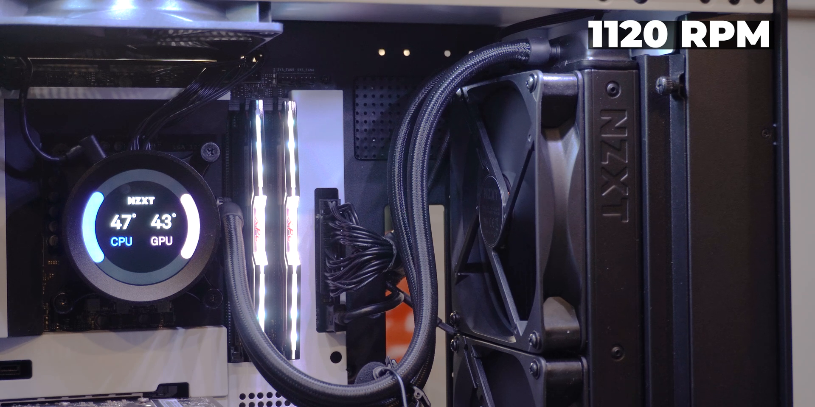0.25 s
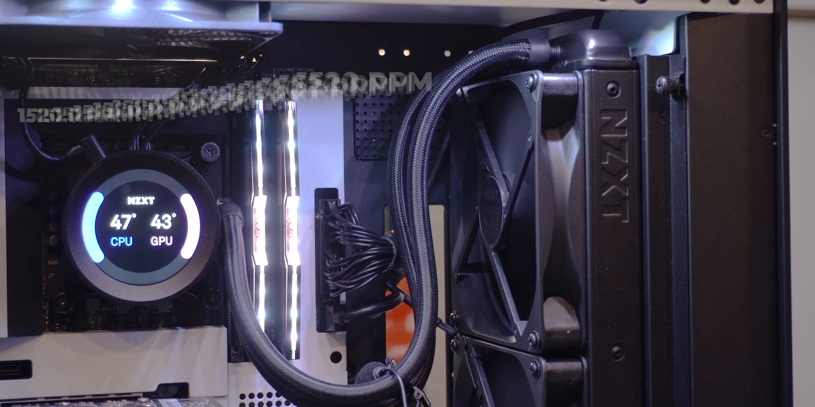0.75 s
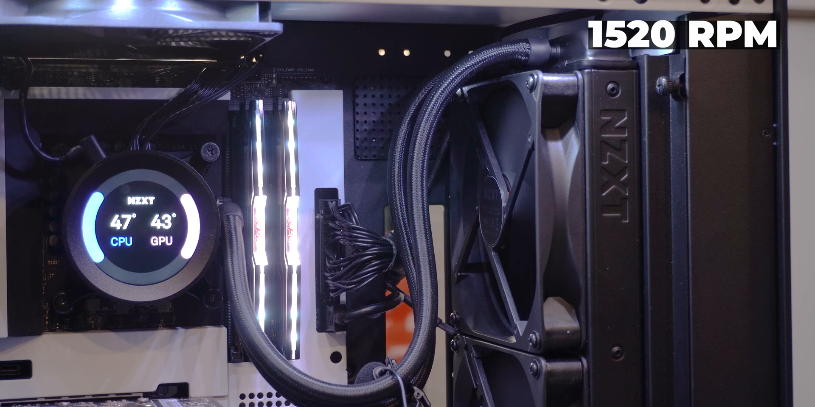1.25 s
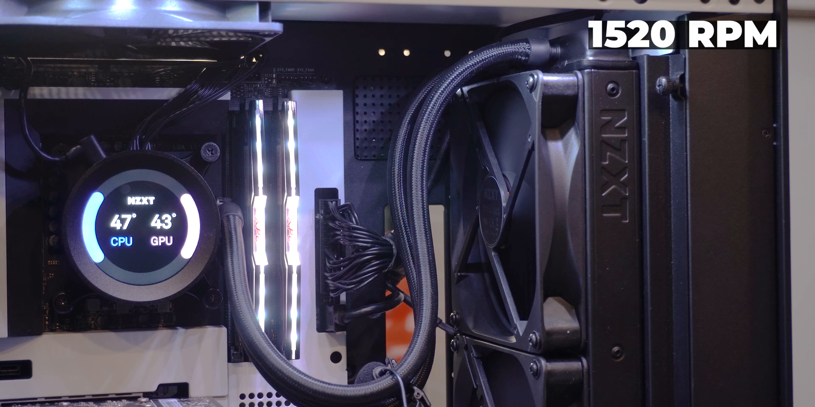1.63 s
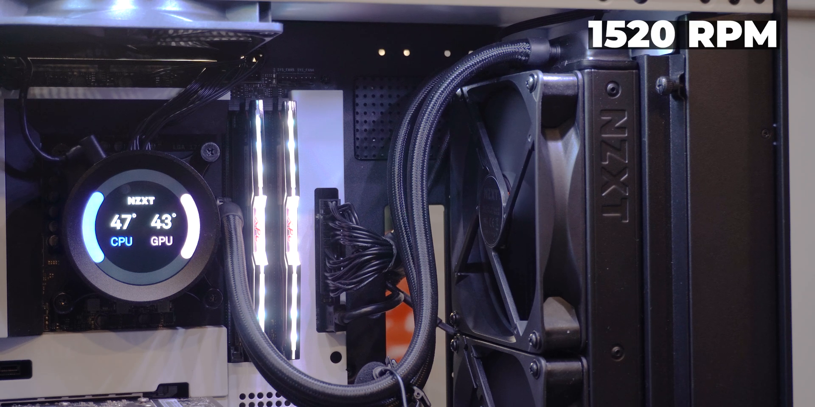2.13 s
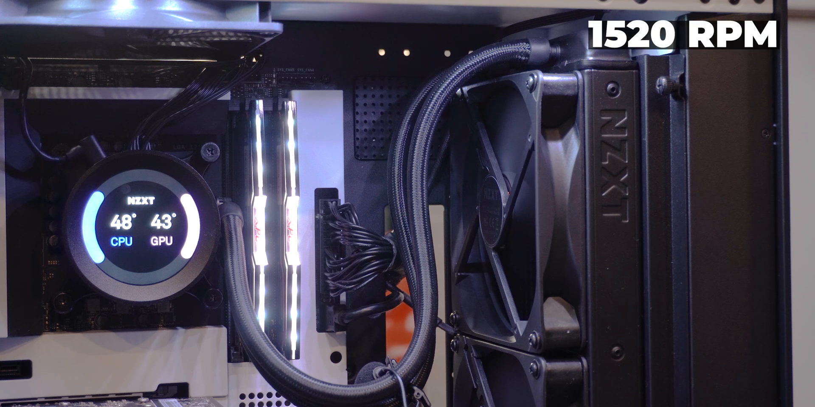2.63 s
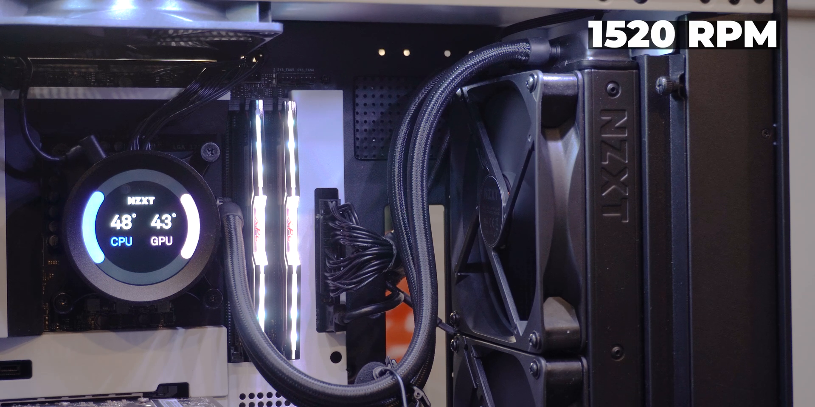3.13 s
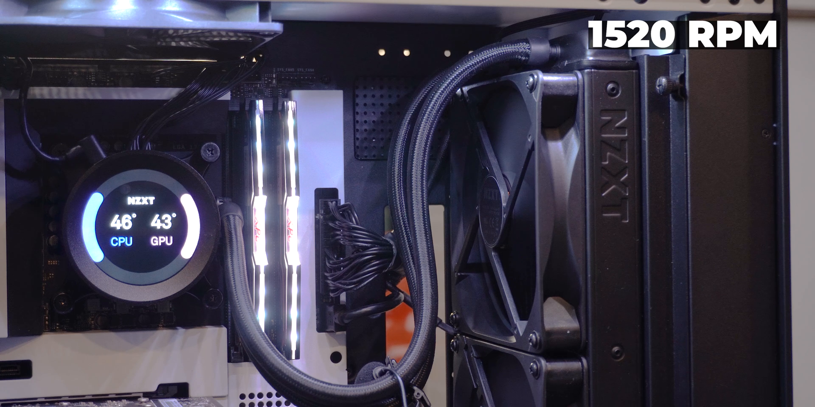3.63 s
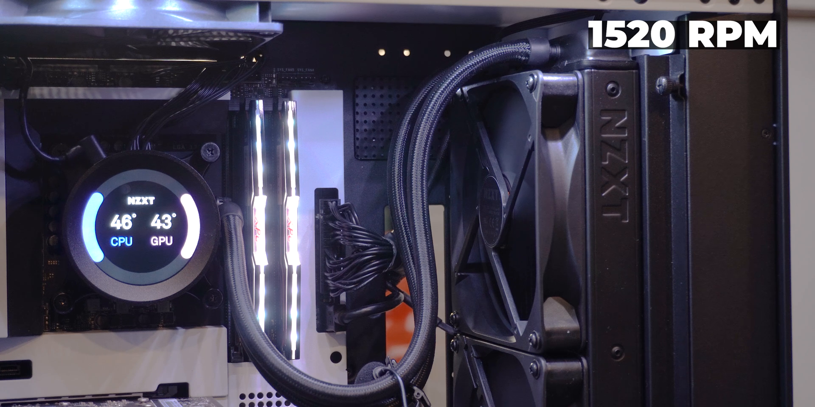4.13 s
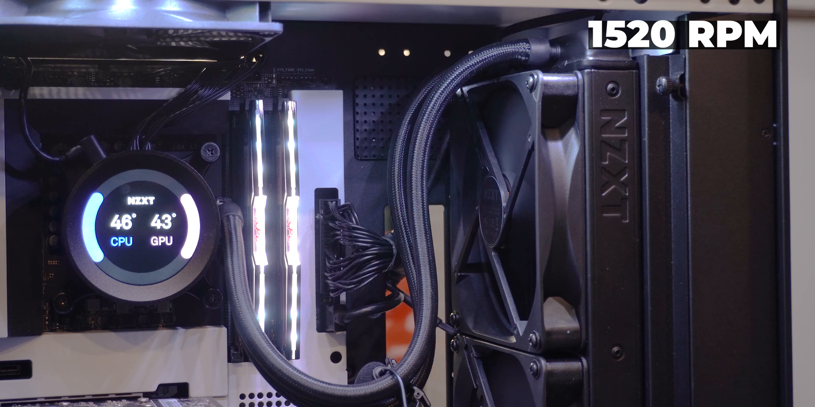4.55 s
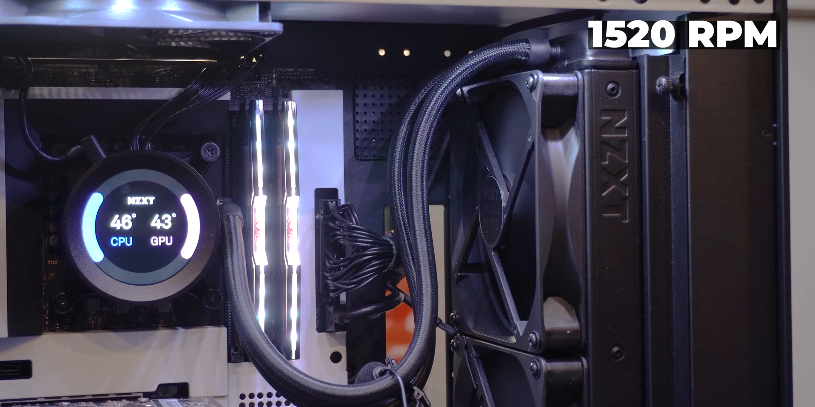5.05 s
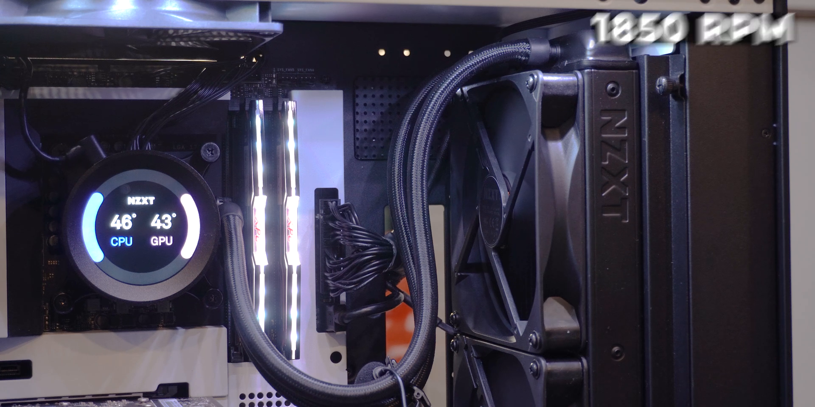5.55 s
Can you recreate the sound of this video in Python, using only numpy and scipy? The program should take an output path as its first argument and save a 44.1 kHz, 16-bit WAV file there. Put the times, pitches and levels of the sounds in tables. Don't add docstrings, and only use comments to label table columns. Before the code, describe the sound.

Computer case fans heard very close, a soft airy whir jumping twice to louder, brighter rushing air with low wind rumble buffeting the microphone.

```python
import sys
import numpy as np
from scipy import signal
from scipy.fft import rfft, irfft
from scipy.io import wavfile
from scipy.ndimage import uniform_filter1d

SR = 44100
rng = np.random.default_rng(int(sys.argv[2]) if len(sys.argv) > 2 else 0)


def unload_wav(signal):
    wavfile.write(
        sys.argv[1],
        SR,
        np.round(np.clip(np.atleast_2d(signal).T, -1, 1) * 32767).astype(np.int16),
    )


def elevation(decibels):
    levels = np.asarray(decibels, float)
    return 10 ** (levels / 20)


N = 254898
TIME = np.arange(N) / SR
BLADES = 7

# start_s, shaft_rpm, waveform_jump (full scale = 1), airflow_db, hum_db
FAN_SPEEDS = [
    (0, 1113, 0.054, -47.5, -54),
    (.6985, 1512, 0.011, -39, -46),
    (5.3698, 1847, -.072, -33.5, -44),
]
# freq_hz, density_db (per Hz)
AIRFLOW_COLOURS = [
    [(90, -29.5), (150, -4), (300, -6), (600, -9), (1100, -14), (1600, -24), (2500, -29), (4000, -38),
     (7000, -50), (15700, -75)],
    [(90, -30), (150, -4), (300, -7), (600, -8.5), (1100, -14), (1600, -19), (2500, -22), (3200, -30.5),
     (4000, -34), (5200, -38.5), (7000, -46), (15700, -70)],
    [(90, -33), (150, -6.5), (300, -5), (600, -8), (1100, -13), (1600, -17.5), (2500, -18.5), (3200, -24.5),
     (4000, -27.5), (5200, -31), (7000, -39.5), (15700, -64.5)],
]
# centre_hz, width_hz, peak_db
CASE_MODES = [(439.1, 120, -1), (552, 60, 4), (634.8, 50, 3), (671, 25, -3), (719.7, 40, 1.5),
              (766.3, 25, -4), (844.8, 60, 3), (910, 80, 1.5), (977.3, 30, -2), (1102.2, 120, 2.5),
              (1508, 150, -3.5), (1693.6, 150, 3.5), (1996.2, 250, 1.5), (2762, 200, -4), (3011.6, 300, 2),
              (3619, 300, -3.5), (4106, 460, 2.5), (4705, 340, 0.5), (5526, 460, 2), (6046, 300, -2),
              (6917, 440, 0.5)]
# multiple (of blade rate), level_db
HUM_HARMONICS = [(1, -1), (2, -7), (3, -11), (4, -18)]
# freq_hz, density_db (per Hz)
EDDY_COLOURS = [
    [(7, -34), (13, -6), (27, 1), (45, 0), (70, -7), (100, -30), (200, -70)],
    [(50, -30), (75, 0), (120, -6), (170, -13), (240, -24), (340, -50)],
]
# large_eddies_db, small_eddies_db
CALM_AIR = [(-39, -43), (-29, -33.5), (-25, -30)]
# centre_s, length_s, peak_db
LARGE_GUSTS = [(0.215, 0.057, -27), (0.395, .08, -30.5), (.67, .06, -27), (.76, .08, -26), (.88, .14, -21),
               (1.172, .16, -20), (1.5, .14, -19), (1.67, 0.081, -22), (1.9, 0.19, -18), (2.02, 0.048, -19),
               (2.18, 0.097, -19.5), (2.431, 0.088, -21), (2.6, 0.11, -23), (2.76, 0.12, -19),
               (3.0, .08, -21.5), (3.15, .12, -19), (3.295, 0.081, -24.5), (3.459, 0.076, -18),
               (3.61, 0.063, -23), (3.82, 0.11, -22), (3.97, 0.076, -21), (4.163, .14, -20.5),
               (4.5, 0.071, -20), (4.63, 0.081, -21), (4.794, 0.087, -21), (5.051, 0.064, -20),
               (5.152, 0.068, -18), (5.281, 0.11, -20), (5.45, .12, -19), (5.63, 0.13, -17.5)]
# centre_s, length_s, peak_db
LITTLE_GUSTS = [(.02, .06, -37), (.24, 0.14, -41), (.6, .12, -38), (1.03, .2, -27.5), (1.33, 0.085, -29),
                (1.57, .16, -27), (1.8, 0.15, -27.5), (2.3, .2, -33), (2.78, 0.19, -29), (3.29, 0.069, -30),
                (3.84, .14, -29.5), (4.031, 0.12, -28), (4.28, .12, -33), (4.5, .2, -29), (5.14, .1, -27.5),
                (5.46, .12, -26), (5.6, 0.082, -18)]
# start_s, peak_s, pitch_hz, climb_hz, peak_db
SQUEAL_EVENTS = [
    (.19, .375, 14000, 90, -67),
    (.24, .35, 10110, 0, -76),
    (2.26, 2.41, 13350, 50, -77),
    (2.52, 2.575, 13360, 10, -76),
]
# time_s, line_hz (50th multiple of the tick rate)
PUMP_SPEED = [(0, 6928), (.69, 6915), (1.1, 6930), (2.2, 6936), (3, 6908), (3.6, 6925), (4.5, 6932),
              (5.78, 6915)]
# centre_hz, width_hz, line_db (per line)
PUMP_HOUSING = [(4100, 700, -90), (4800, 700, -91), (5400, 400, -94), (6900, 900, -88.5), (7900, 400, -95)]
# pitch_hz, level_db
WHINES = [(10002, -99), (10998, -96)]
# freq_hz, density_db (per Hz)
HISS_COLOUR = [(300, 14), (3000, 2.5), (4200, 5), (6000, 0.5), (6900, 0.5), (7500, -3), (9000, -2.5),
               (15000, -3),
               (15700, -2), (15740, -60)]


def level(x, db):
    return x * elevation(db) / np.sqrt(np.mean(x ** 2))


def coloured(points, modes=()):
    hz = np.maximum(np.fft.rfftfreq(N, 1 / SR), 1)
    point_hz = [p[0] for p in points]
    point_db = [p[1] for p in points]
    db = np.interp(np.log(hz), np.log(point_hz), point_db, left=-200, right=-200)
    for centre_hz, width_hz, peak_db in modes:
        db = db + peak_db / (1 + (2 * (hz - centre_hz) / width_hz) ** 2)
    white = rng.standard_normal(N)
    return level(irfft(rfft(white) * elevation(db), N), 0)


def walk(rate):
    hold = int(SR / rate)
    steps = np.repeat(rng.standard_normal(N // hold + 1), hold)
    smooth = uniform_filter1d(uniform_filter1d(steps, hold), hold)
    return 1.3 * smooth[:N]


def tone(hz):
    cycles = np.cumsum(hz + 0 * TIME) / SR + rng.random()
    return np.sqrt(2) * np.sin(2 * np.pi * cycles)


def airflow(colour, flow_db):
    swell_db = .1 * walk(rate=2) + .5 * walk(rate=80)
    return level(coloured(colour, CASE_MODES) * elevation(swell_db), flow_db)


def hum(rpm, hum_db):
    out = 0
    for fan in (.995, 1.005):
        blade_hz = BLADES * rpm / 60 * fan * (1 + .004 * walk(rate=4))
        for multiple, db in HUM_HARMONICS:
            out = out + elevation(db + 3.0 * walk(rate=9)) * tone(multiple * blade_hz)
    return out * elevation(hum_db - 4)


def buffet(colour, evenness=.6):
    eddies = coloured(colour)
    power = uniform_filter1d(uniform_filter1d(eddies ** 2, size=3000), size=3000)
    return level(eddies / np.sqrt(power) ** evenness, 0)


def gusting(calm_db, gusts):
    power = elevation(calm_db) ** 2
    for centre_s, length_s, peak_db in gusts:
        power = power + elevation(peak_db) ** 2 * np.exp(-(2 * (TIME - centre_s) / length_s) ** 2)
    return np.sqrt(power)


def fans():
    out = np.zeros(N)
    for (start_s, rpm, jump, flow_db, hum_db), colour, calm in zip(FAN_SPEEDS, AIRFLOW_COLOURS, CALM_AIR):
        i = int(start_s * SR)
        steady = airflow(colour, flow_db) + hum(rpm, hum_db)
        eddies = np.array([buffet(c) for c in EDDY_COLOURS])
        large = gusting(calm[0], LARGE_GUSTS) * elevation(-1.5)
        small = gusting(calm[1], LITTLE_GUSTS) * elevation(-2)
        gusts = np.array([large, small])
        miss = np.abs(steady + gusts[:, i] @ eddies - out[i] - jump)
        shift = i - np.argmin(miss[:SR])
        wind = np.sum(gusts * np.roll(eddies, shift, axis=1), axis=0)
        out[i:] = (np.roll(steady, shift) + wind)[i:]
    return out


def squeals():
    swell_db_s, fade_db_s, climb_s = 60, 75, .1
    out = 0
    for start_s, peak_s, hz, climb_hz, peak_db in SQUEAL_EVENTS:
        age = np.maximum(TIME - start_s, 0)
        swell_db = peak_db - np.maximum(swell_db_s * (peak_s - TIME), fade_db_s * (TIME - peak_s))
        pitch_hz = hz - climb_hz * np.exp(-age / climb_s) + 25 * walk(rate=300)
        stutter = level(elevation(3.8 * walk(rate=80)), 0)
        onset = np.clip(age / 0.02, 0, 1)
        out = out + onset * stutter * elevation(swell_db) * tone(pitch_hz)
    return out


def pump():
    tick_hz = np.interp(TIME, *np.transpose(PUMP_SPEED)) / 50
    turn = np.cumsum(tick_hz) / SR
    ticks = np.append(0, np.diff(np.floor(turn))) * elevation(1.5 * walk(rate=140))
    hz = np.fft.rfftfreq(N, 1 / SR)
    ring = 0
    for centre_hz, width_hz, db in PUMP_HOUSING:
        ring = ring + elevation(db) / (1 + 2j * (hz - centre_hz) / width_hz) ** 2
    return irfft(rfft(ticks / np.sqrt(2) / ticks.mean()) * ring, N)


def whines():
    out = 0
    for hz, db in WHINES:
        out = out + elevation(db + 2.5 * walk(rate=12)) * tone(hz + 6.0 * walk(rate=8))
    return out


def hiss():
    return level(coloured(HISS_COLOUR), -68.5)


def scene():
    return (fans() + squeals() + pump() + whines() + hiss())[None]


def low_pass(x):
    return signal.sosfilt(signal.butter(12, 16300, fs=SR, output="sos"), x)


def record(dry):
    return low_pass(dry)


dry = scene()
out = record(dry)
unload_wav(out)
```